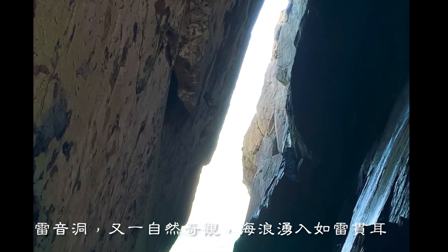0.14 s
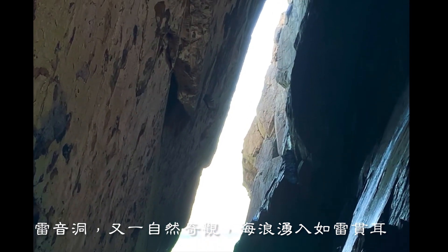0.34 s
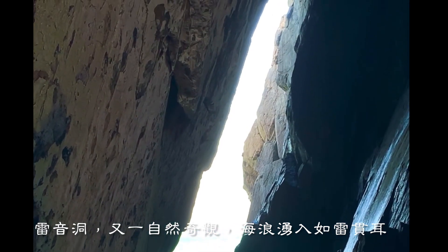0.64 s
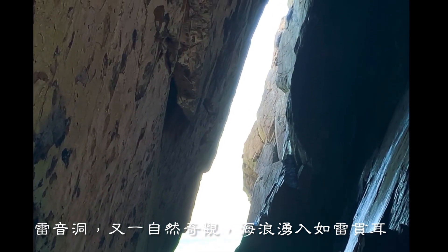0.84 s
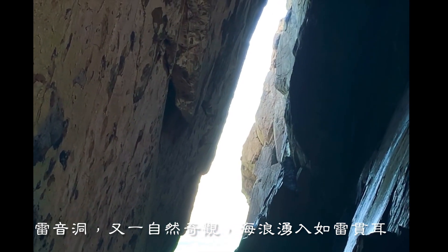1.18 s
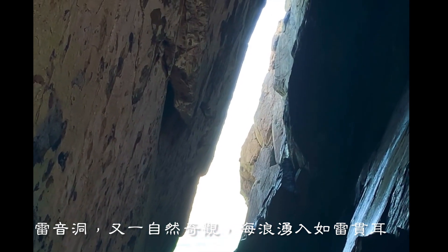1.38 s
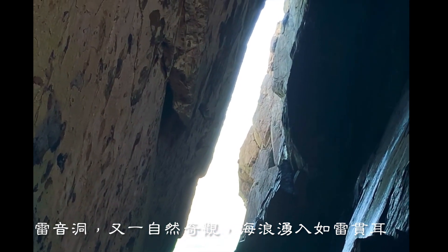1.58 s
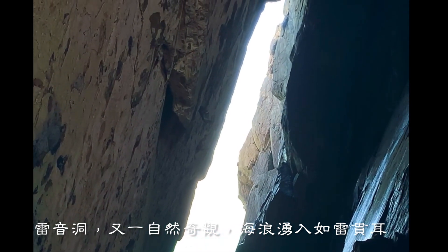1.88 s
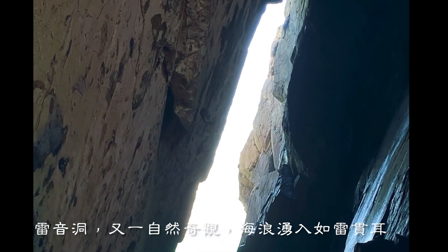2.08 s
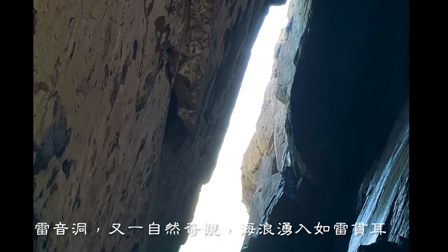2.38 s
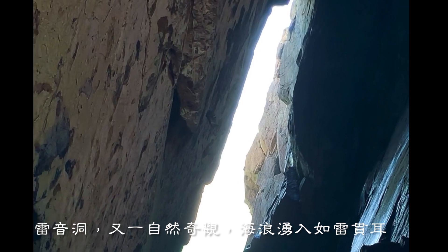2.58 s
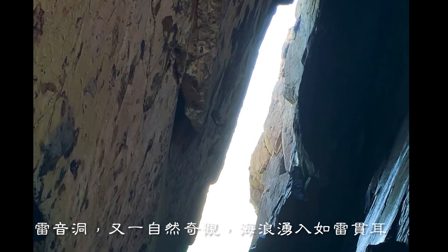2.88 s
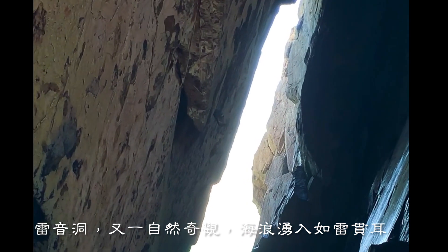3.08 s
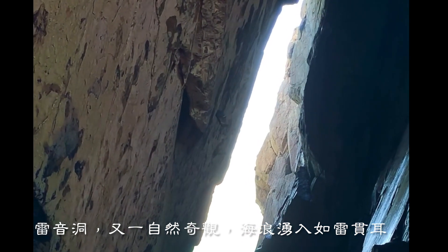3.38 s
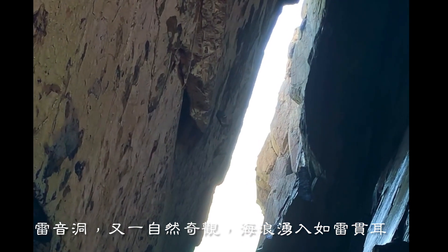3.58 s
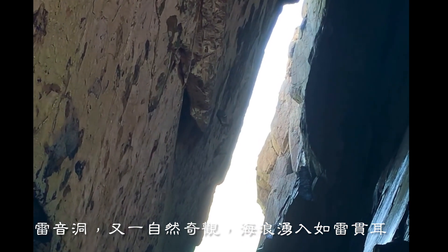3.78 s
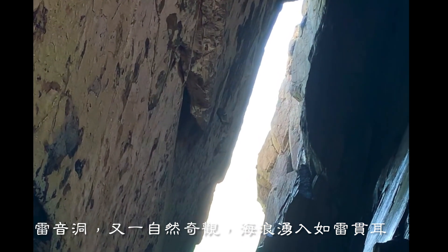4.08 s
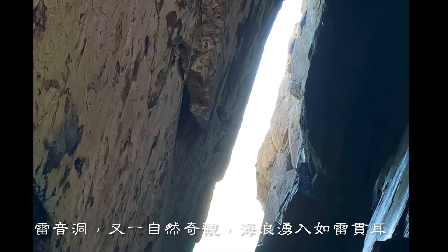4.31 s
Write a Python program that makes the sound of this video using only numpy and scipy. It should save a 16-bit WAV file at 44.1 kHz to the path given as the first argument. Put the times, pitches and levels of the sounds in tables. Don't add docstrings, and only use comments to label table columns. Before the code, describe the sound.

A small stereo recorder sits between the walls of a narrow sea cleft. From the start a wave is already in: a thick, low-heavy roar of churning water, with wet slaps sealing hollows and deep, short booms of trapped air, strongest in the first 0.6 seconds. The wash then drains and eases, with scattered low thuds and hollow, pitched bloops from closing air pockets until about 1.4 seconds. Booms gather again, and near 1.7 seconds one large pocket slams shut with a deep thump that falls quickly in pitch. Slaps continue, and from 2.3 seconds new waves break, with hissing spray towards one side, and knocks crowding together. From about 3 to 4.4 seconds foam washes more fully, a longer low boom lands near 3.3, and air pockets ring thickly to the end. Large bubbles gurgle close by throughout; the walls add a hollow resonance, and the highest treble is dulled.

```python
import sys
import numpy as np
from scipy import signal
from scipy.fft import rfft, irfft, next_fast_len
from scipy.io import wavfile
from scipy.ndimage import uniform_filter1d

SR = 44100
rng = np.random.default_rng(int(sys.argv[2]) if len(sys.argv) > 2 else 0)


def convert_level_to_amplitude(level_db):
    exponent = np.asarray(level_db, float) / 20
    return 10 ** exponent


def transcribe(signal):
    frames = np.atleast_2d(signal).T
    limited = np.clip(frames, -1, 1)
    pcm = np.round(limited * 32767).astype(np.int16)
    wavfile.write(sys.argv[1], SR, pcm)


N = 196200

# middle_s, peak_db, pitch_hz, length_s
AIR_POCKETS = [(0.01, -19, 232.4, 0.029), (0.042, -30.5, 713, 0.084), (0.053, -23, 251.4, 0.073),
               (0.13, -28, 572, 0.032), (0.19, -22.5, 171.5, 0.063), (0.215, -23, 700, 0.058),
               (0.289, -30, 107.5, 0.073), (0.29, -25, 347, 0.032), (0.402, -30, 293, 0.038),
               (0.408, -28, 236, 0.081), (0.459, -27, 257, 0.096), (0.519, -26.5, 247, 0.09),
               (0.57, -24.5, 674, 0.035), (0.723, -25.5, 339, 0.049), (0.8, -30, 656, 0.032),
               (0.998, -25, 205, 0.052), (1.024, -26.5, 368, 0.046), (1.088, -20.5, 202, 0.048),
               (1.191, -25, 700, 0.033), (1.419, -21, 228, 0.03), (1.859, -24, 227, 0.041),
               (2.129, -22, 222, 0.036), (2.264, -24, 454, 0.049), (2.308, -23, 248, 0.044),
               (2.496, -28, 418, 0.027), (2.807, -22, 477, 0.029), (3.036, -19.5, 172, 0.059),
               (3.12, -22.5, 178.6, 0.14), (3.158, -27.5, 657, 0.057), (3.199, -23.5, 158.2, 0.12),
               (3.266, -24, 330, 0.026), (3.384, -24, 189.5, 0.066), (3.58, -25.5, 654, 0.04),
               (3.61, -23.5, 359, 0.0436), (3.657, -22.5, 204.5, 0.044), (3.733, -22, 220, 0.043),
               (3.744, -23, 684, 0.032), (3.918, -32, 696, 0.064), (3.948, -21, 416.5, 0.045),
               (3.995, -25.5, 421, 0.078), (3.999, -22, 210, 0.032), (4.033, -23.5, 639, 0.052),
               (4.043, -27, 573, 0.052), (4.074, -28, 710, 0.041), (4.104, -24, 573, 0.04),
               (4.106, -22, 231, 0.057), (4.167, -26, 662, 0.104), (4.293, -24, 220, 0.037),
               (4.296, -30, 670, 0.033), (4.301, -23.5, 340.6, 0.067)]
THUMP_START_S, THUMP_RISE_S = 1.673, .015


def swell_db(hz):
    # arrive_s, over_lull_db, bubble_hz, fall_10db_s
    waves = [(-.6, 15, 42.3, 2), (-.4, 3.5, 130, 1.5), (-.35, 6, 5700, 1.64), (1.3, 6.5, 80, 5),
             (1.86, -1.5, 6030, -2.2), (2.3, 4.5, 11900, 1.5), (2.8, 6, 147, .5), (2.7, -4, 5500, 0),
             (3.2, 1, 6500, 2.5), (3.6, 1.5, 1700, -3.5), (3.15, 7, 9700, 5), (3.5, 5.5, 970, 0.5),
             (3.6, 8.5, 745, 4.5)]
    break_s, reach_db_per_octave = .55, 2.5
    power = np.ones(N)
    for arrive_s, over_lull_db, bubble_hz, fall_s in waves:
        age_s = np.clip(np.arange(N) / SR - arrive_s, 0, None)
        shape = (1 - np.exp(-(age_s / break_s) ** 2)) * 10 ** (-age_s / max(fall_s, .1))
        db = over_lull_db - reach_db_per_octave * abs(np.log2(hz / bubble_hz))
        power = power + convert_level_to_amplitude(2 * db) * shape / shape.max()
    db = 10 * np.log10(power)
    return db - db.mean()


def shade_db(hz, octaves=.29, pocket_db=.5, thump_db=7, thump_s=.03, thump_below_hz=200):
    t = np.arange(0, N, 64) / SR
    near = 0
    for middle_s, _, pitch_hz, length_s in AIR_POCKETS:
        near = near + np.exp(-(np.log2(hz / pitch_hz) / octaves) ** 2 - ((t - middle_s) / length_s) ** 2)
    near_thump = (hz < thump_below_hz) * np.exp(-((t - THUMP_START_S - THUMP_RISE_S) / thump_s) ** 2)
    loss_db = pocket_db * np.minimum(near, 1) + thump_db * near_thump
    return -np.interp(np.arange(N) / SR, t, loss_db)


def cleft_colour(hz):
    # freq_hz, level_db
    water = np.array([(22, -30), (33, -22), (50, -4.5), (100, -3), (300, -3.5), (500, -11), (900, -16),
                      (1400, -17.5), (2000, -19), (3000, -24), (5000, -25), (8500, -28), (12500, -32),
                      (16000, -39)])
    # centre_hz, width_hz, lift_db
    resonances = [(181, 92, 2.5), (682, 228, 8), (1087, 53, 3.5)]
    db = np.interp(np.log(hz + 1), np.log(water[:, 0]), water[:, 1], left=-60)
    for centre_hz, width_hz, lift_db in resonances:
        db = db + lift_db / (1 + (2 * (hz - centre_hz) / width_hz) ** 2)
    return convert_level_to_amplitude(db)


def column(table, k, hz):
    table = np.array(table)
    return np.interp(hz, table[:, 0], table[:, k])


def at_ports(common, other, hz):
    # freq_hz, likeness_0_1, left_lead_rad, left_minus_right_db
    ports = [(30, .82, 0, -.3), (70, .38, 0, -1.3), (220, .9, -.3, -.7), (600, .9, -.55, -3),
             (1250, .66, -.2, -1.4), (1950, .62, .9, -1.5), (2400, .7, 3.3, -.6), (3700, .6, 1.4, -.3),
             (4600, .81, 2.9, -.5)]
    # centre_hz, width_hz, likeness_lost_0_1
    scatter = [(520, 120, .33), (950, 220, .72), (2100, 260, .6), (3300, 1000, .45), (4050, 600, .45)]
    side_lag_s = 1.93e-4
    like = column(ports, 1, hz)
    for centre_hz, width_hz, lost in scatter:
        like = like * (1 - lost / (1 + (2 * (hz - centre_hz) / width_hz) ** 2))
    above_hz = np.clip(hz - ports[-1][0], 0, None)
    tilt = convert_level_to_amplitude(column(ports, 3, hz) * np.exp(-above_hz / 2000) / 2)
    lead_rad = column(ports, 2, hz) + 2 * np.pi * side_lag_s * above_hz
    left = common * np.exp(1j * lead_rad)
    right = like * common + np.sqrt(1 - like ** 2) * other
    return np.array([left * tilt, right / tilt])


def walk(rate_hz):
    k = int(SR / rate_hz)
    held = np.repeat(rng.standard_normal(N // k + 1), k)
    return 1.36 * uniform_filter1d(uniform_filter1d(held, k), k)[:N]


def even(x, share=.3, window_s=.04):
    size = int(window_s * SR)
    power = uniform_filter1d(uniform_filter1d(np.mean(x ** 2, axis=0), size), size)
    return x * (power.mean() / (np.abs(power) + power.mean() / 20)) ** (share / 2)


def surf(level_db=-24, splash_db=.6, patch_db=.25, flicker_db=.55, spray_hz=(65, 5000), even_below_hz=1000):
    size = next_fast_len(N)
    hz = np.fft.rfftfreq(size, 1 / SR)
    common, other = rfft(rng.standard_normal((2, size)))
    sound = at_ports(common, other, hz) * cleft_colour(hz)
    splash, patch, out = walk(36), walk(10), 0
    splash = splash - uniform_filter1d(splash, size=SR // 11)
    steps = 2 * np.log2((hz + 1) / 20)
    for k in range(21):
        centre_hz = 20 * 2 ** (k / 2)
        patch = .8 * patch + .6 * walk(10)
        patch = patch - uniform_filter1d(patch, size=SR // 6)
        reach = np.interp(np.log(centre_hz), np.log(spray_hz), [0, 1])
        db = swell_db(centre_hz) + shade_db(centre_hz)
        db = db + splash_db * reach * splash + patch_db * patch + flicker_db * walk(20)
        band = np.cos(np.pi / 2 * np.clip(steps - k, -1, 1)) ** 2
        roar = irfft(sound * band, size)[:, :N]
        if centre_hz < even_below_hz:
            roar = even(roar)
        out = out + convert_level_to_amplitude(db) * roar
    return out * convert_level_to_amplitude(level_db) / np.sqrt(np.mean(out ** 2))


def slaps_and_booms(rise_s=.01, sink=.4, sink_s=.0092, slap_t60_s=.06, trim_db=-4.0):
    # start_s, peak_db, pitch_hz
    hollows = [(0.02, -14, 63), (0.145, -14, 116), (0.407, -18, 80), (0.645, -19, 90), (0.699, -25, 177),
               (0.831, -21, 76.4), (0.95, -21, 307), (1.19, -23.5, 326), (1.499, -16, 142),
               (1.62, -21, 188), (1.73, -20, 190), (1.762, -22, 240), (1.799, -17, 120), (1.98, -22, 260),
               (2.229, -21, 118), (2.33, -23, 290), (2.51, -20.5, 342), (2.41, -16, 203), (2.589, -15, 126),
               (2.719, -17.5, 180), (2.79, -20, 202), (2.89, -21, 150), (2.92, -19.5, 110),
               (3.21, -20, 115), (3.27, -22, 340), (3.31, -20, 240), (3.38, -21, 328), (3.57, -23.5, 700),
               (3.5, -20, 278), (3.7, -17, 205), (3.85, -17, 196), (3.92, -20, 198), (3.959, -20, 205),
               (4.01, -19, 196), (4.42, -18, 188), (4.07, -20.5, 109), (4.155, -21, 60)]
    # start_s, peak_db, pitch_hz, t60_s
    booms = [(.07, -17, 90, 0.15), (.18, -17, 75, .14), (.278, -16.5, 100.4, 0.15), (.54, -23, 48, .12),
             (0.884, -21, 45, .12), (1.44, -20, 45, 0.12), (1.5, -22, 50, .1), (1.6, -20, 42, .14),
             (1.81, -21, 48, 0.11), (1.91, -22, 45, 0.088), (2.43, -29, 45, 0.088), (3.33, -19.5, 53, .3),
             (3.638, -23, 55, 0.067)]
    events = [tuple(row) + (slap_t60_s,) for row in hollows] + [tuple(row) for row in booms]
    out, t = np.zeros(N + SR), np.arange(SR // 4) / SR
    for start_s, peak_db, pitch_hz, t60_s in events:
        swell = 1 - np.exp(-(t / rise_s) ** 2)
        shape = swell * np.exp(-np.log(1000) * t / max(t60_s, .02))
        turns = np.cumsum(pitch_hz * (1 + sink * np.exp(-t / sink_s))) / SR
        start = max(int((start_s - rise_s / 2) * SR), 0)
        level = convert_level_to_amplitude(peak_db + trim_db) / shape.max()
        out[start:start + len(t)] += level * shape * np.sin(2 * np.pi * turns)
    return out[:N]


def thump(peak_db=-13.5, final_hz=56, extra_share=1.75, sink_s=.017):
    age_s = np.clip(np.arange(N) / SR - THUMP_START_S, 0, None)
    pitch_hz = final_hz * (1 + extra_share * np.exp(-(age_s / sink_s) ** 2))
    turns = np.cumsum(pitch_hz * (age_s > 0)) / SR
    rise = age_s / THUMP_RISE_S
    return convert_level_to_amplitude(peak_db) * rise * np.exp(.5 - .5 * rise ** 2) * np.sin(2 * np.pi * turns)


def pockets(trim_db=-2.0, stretch=1.5, pitch_rise=.064):
    out = np.zeros(N + 2 * SR)
    for middle_s, peak_db, pitch_hz, length_s in AIR_POCKETS:
        u = np.linspace(-.5, .5, int(max(stretch * length_s, .02) * SR))
        turns = np.cumsum(pitch_hz * (1 + pitch_rise * u)) / SR
        start = SR + int(middle_s * SR) - len(u) // 2
        shape = np.cos(np.pi * u) ** 1.63
        out[start:start + len(u)] += convert_level_to_amplitude(peak_db + trim_db) * shape * np.sin(2 * np.pi * turns)
    return out[SR:SR + N]


def gurgle(level_db=-39.5, count=900, low_hz=250, octaves=2.8, cycles=9.02, glide=.1954, spread_db=4.5):
    wash_db = swell_db(800)
    out = np.zeros((2, N + SR))
    for when, size, loud, side in rng.random((count, 4)):
        hz = low_hz * 2 ** (octaves * size)
        t = np.arange(int(3 * cycles / hz * SR)) / SR * hz / cycles
        ring = np.sin(2 * np.pi * cycles * (t + glide * t ** 2 / 2)) * t * np.exp(-2 * t)
        start = int(when * N)
        db = wash_db[start] - spread_db * np.log(loud + .03) - 4 * octaves * size
        pan = np.array([[np.cos(.48 + .51 * side)], [np.sin(.35 + .4 * side)]])
        out[:, start:start + len(t)] += convert_level_to_amplitude(db) * ring * pan
    out = out[:, :N]
    return out * convert_level_to_amplitude(level_db) / np.sqrt(np.mean(out ** 2))


def scene():
    thuds = slaps_and_booms() + pockets() + thump()
    lag_s = .00023
    late = np.interp(np.arange(N) - lag_s * SR, np.arange(N), thuds)
    return surf() + gurgle() + np.array([late, thuds]) * convert_level_to_amplitude(np.array([[-.3], [.3]]))


def top_cut(x):
    return signal.sosfilt(signal.butter(12, 15750, fs=SR, output="sos"), x)


def record(dry, near_db=-4.0, weak_db=-2.5, thin_from_hz=1050):
    # muted_0_1, from_hz, to_hz, from_step_hz, to_step_hz (edges step now and then)
    muted = [
        (1, 6820, 7540, -400, 0),
        (0, 9040, 10330, 260, 90),
        (1, 11640, 13020, -340, -60),
        (0, 14290, 16500, 120, 0),
    ]
    # middle_s, from_hz, to_hz, length_s
    gaps = [
        (1.51, 5000, 5300, .025),
        (2.598, 4650, 5100, .025),
        (2.955, 2280, 2600, .07),
        (3.41, 2450, 2650, .035),
        (1.86, 4700, 4900, .04),
        (3.42, 4850, 5150, .015),
        (3.83, 2180, 2320, .025),
        (4.05, 4800, 5000, .035),
    ]
    # from_s, to_s
    wider = [(0, .17), (.31, .36), (.48, .68), (.96, 1.01), (1.61, 1.66), (1.85, 1.96), (2.38, 2.54)]
    wider_to_hz, spared_s, spared_from_hz = 8200, (.755, .78), 9600
    pair = np.array([dry[0] + dry[1], dry[0] - dry[1]]) / 2
    hz, t, frames = signal.stft(pair, SR, nperseg=2048)
    hz = hz[:, None]
    around = uniform_filter1d(np.abs(frames), size=14, axis=1)
    frames = frames * ((np.abs(frames) > convert_level_to_amplitude(weak_db) * around) | (hz < thin_from_hz))
    for which, low_hz, high_hz, *step_hz in muted:
        moved = np.repeat(rng.random((2, len(t))), 2, axis=1)[:, :len(t)] < .36
        edges_hz = np.array([[low_hz], [high_hz]]) + np.array(step_hz)[:, None] * moved
        spared = (t > spared_s[0]) & (t < spared_s[1]) & (hz > spared_from_hz) & (hz < high_hz)
        spared = spared & (which == 0) & (low_hz < spared_from_hz)
        outside = (hz < edges_hz[0]) | (hz > edges_hz[1])
        frames[which] *= np.where(spared, convert_level_to_amplitude(10.5), outside)
        frames[which] *= convert_level_to_amplitude(near_db * np.clip(1 - (low_hz - hz) / 700, 0, 1) * (hz < high_hz))
    for middle_s, low_hz, high_hz, length_s in gaps:
        frames[0] *= (np.abs(t - middle_s) > length_s / 2 + .01) | (hz < low_hz) | (hz > high_hz)
    for start_s, end_s in wider:
        frames[1] *= (t < start_s) | (t > end_s) | (hz < muted[0][1]) | (hz > wider_to_hz)
    mid, side = signal.istft(frames, SR, nperseg=2048)[1][:, :N]
    return top_cut(np.array([mid + side, mid - side]))


dry = scene()
out = record(dry)
transcribe(out)
```